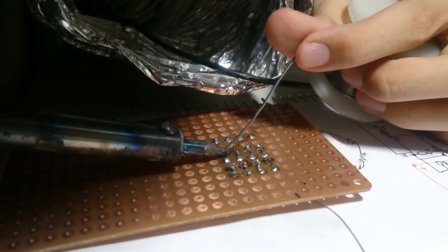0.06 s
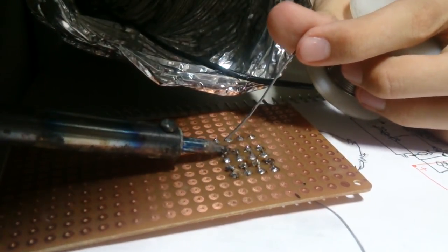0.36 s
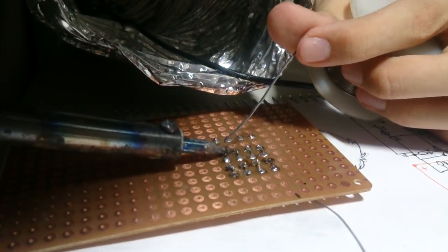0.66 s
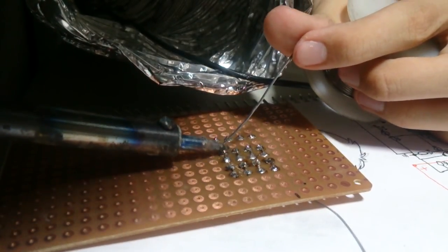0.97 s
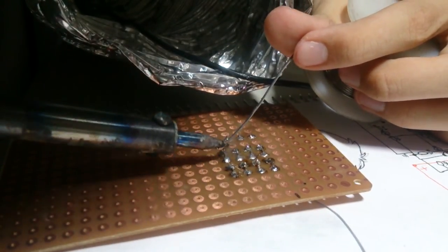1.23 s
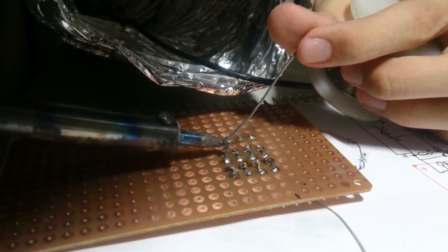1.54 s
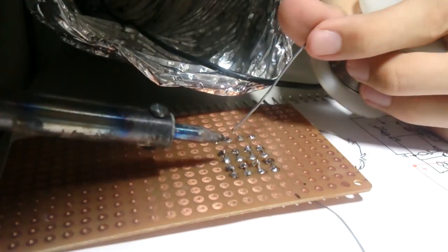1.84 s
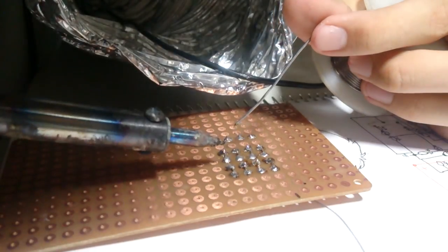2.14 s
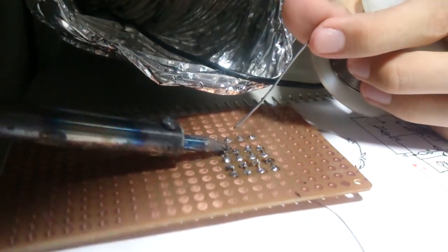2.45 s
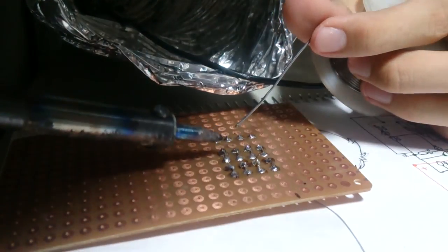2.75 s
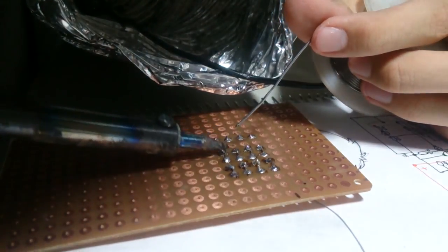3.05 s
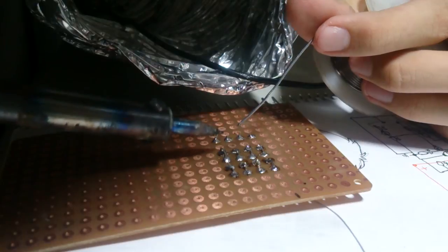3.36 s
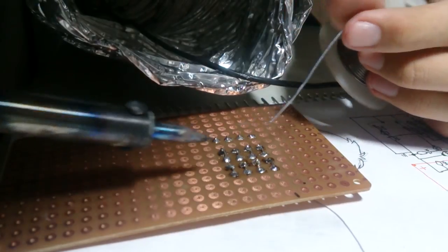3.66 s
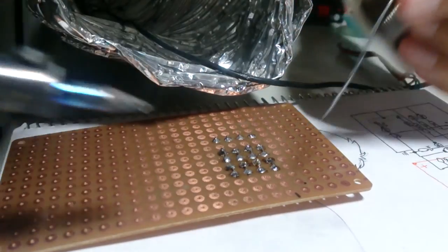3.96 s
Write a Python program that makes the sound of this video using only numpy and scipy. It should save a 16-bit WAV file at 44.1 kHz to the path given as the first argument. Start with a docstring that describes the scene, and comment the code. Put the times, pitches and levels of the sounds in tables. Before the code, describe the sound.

A fan drones throughout, its draught buffeting the close microphone with soft low gusts and thumps on either side, strongest around 0.3, 1.5, 3.2 and 3.8 seconds. On the left, a soldering iron and wire touch a circuit board with tiny bright ticks and scrapes, clearest at 1.1 and 2.6 seconds, fainter near 0.8, 3.5 and 3.8. A faint hiss and thin electrical buzz continue underneath.

```python
"""At a workbench, close to the microphone, someone solders a circuit board.
A fan drones. Its draught buffets the microphone's two openings (ports), each on its own,
in soft low gusts, flutters and thumps. To the left, the iron's tip and the solder wire tick
and scrape briefly on the joints, making the board ring.
A thin mains buzz and a faint hiss run throughout."""
import sys
import numpy as np
from scipy import signal
from scipy.fft import rfft, irfft
from scipy.io import wavfile
from scipy.ndimage import uniform_filter1d

SR = 44100
rng = np.random.default_rng(int(sys.argv[2]) if len(sys.argv) > 2 else 0)


def output_pcm(signal):
    """Save a mono or channel-first signal as 16-bit PCM at the path in sys.argv[1].

    Samples are clipped to [-1, 1] before scaling.
    """
    pcm = np.clip(np.atleast_2d(signal).T, -1, 1) * 32767
    wavfile.write(sys.argv[1], SR, np.round(pcm).astype(np.int16))


N = 176400   # 4 seconds
TIME = np.arange(N) / SR
HZ = np.maximum(np.arange(N // 2 + 1) * SR / N, 1)


def from_db(db):
    """Turn decibels into a number to multiply by."""
    return 10 ** (np.asarray(db) / 20)


def unit_level(x):
    """Scale a signal so that its average level (rms) is 1."""
    return x / np.sqrt(np.mean(x ** 2) + 1e-20)


def curve(rows, column=1):
    """Join a table's points into one value for every frequency."""
    rows = np.array(rows)
    return np.interp(np.log(HZ), np.log(rows[:, 0]), rows[:, column])


def white():
    """The spectrum of fresh noise, equally strong at all frequencies."""
    return rfft(rng.standard_normal(N))


def noise(colour):
    """Noise at level 1; colour says how strong each frequency is."""
    return unit_level(irfft(white() * colour, N))


def swell(start, length, rise, fade):
    """A level that rises, holds and dies away; all times are in seconds."""
    rising = np.clip((TIME - start) / rise + .5, 0, 1)
    return rising * np.exp(-np.maximum(TIME - start - length, 0) / fade)


def steadied(x, seconds):
    """Even out the chance swings in a noise's level."""
    return x / np.sqrt(uniform_filter1d(x ** 2, max(int(seconds * SR), 2)) + 0.056)


def causal(gain):
    """A filter with this gain that never sounds before it is struck (minimum phase)."""
    cepstrum = irfft(np.log(gain + 1e-9), N)
    cepstrum[1:N // 2] *= 2
    cepstrum[N // 2 + 1:] = 0
    return np.exp(rfft(cepstrum))


# The fan's rush of air. Each row: frequency in Hz, relative strength in dB.
RUSH_COLOUR = [(20, 1), (40, 4), (70, 2.5), (110, -5), (165, -11), (260, -10.5), (380, -16), (500, -17),
               (630, -15.5), (750, -17.5), (840, -22), (1000, -21.5), (1120, -25), (1500, -29),
               (2000, -27.5)]
# How alike the rush is at the two ports. Each row: frequency in Hz, likeness from 0 to 1.
RUSH_LIKENESS = [(40, 0.38), (130, 0.53), (290, 1), (640, 1), (1050, 0.69), (1600, 0.61)]
# The fan's tones. Each row: pitch in Hz, level in dB, width in Hz.
BLADE_TONES = [(59.2, -38.5, 2), (119.9, -49, 2), (232, -46.5, 14), (424, -58, 10), (566, -57.5, 18),
               (716, -60.5, 14), (744, -62.5, 3), (874, -59, 20), (951, -63.5, 20), (1024, -63, 18),
               (1064, -66, 3), (1185, -65.5, 28), (1276, -70, 5)]
RUSH_DB, RIGHT_DELAY_S, PAN_DB = -34.5, 0.00022, 0.88
WHINE_HZ, WHINE_DB, WHINE_WAVER_HZ = 481.3, -52, 0.9

def fan():
    """Rushing air, wavering blade tones and a motor whine reach the left port first, and louder."""
    colour = from_db(curve(RUSH_COLOUR)) / (1 + (HZ / 1900) ** 10)
    alike = np.clip(curve(RUSH_LIKENESS), 0, 1)
    shared = white() * np.sqrt(alike)
    blades = sum(from_db(db) * steadied(noise(1 / (1 + (2 * (HZ - hz) / width) ** 2)), seconds=0.21)
                 for hz, db, width in BLADE_TONES)
    pitch = WHINE_HZ + WHINE_WAVER_HZ * noise(1 / (1 + (HZ / 10) ** 2))
    whine = from_db(WHINE_DB) * np.sqrt(2) * np.sin(2 * np.pi * np.cumsum(pitch) / SR)
    tones = rfft(blades + whine)
    ports = []
    for seconds in (0, RIGHT_DELAY_S):
        delay = np.exp(-2j * np.pi * HZ * seconds)
        own = white() * np.sqrt(1 - alike)
        rush = unit_level(irfft(colour * (shared * delay + own), N))
        ports.append(from_db(RUSH_DB) * rush + irfft(tones * delay, N))
    return np.array(ports) * from_db([[PAN_DB], [-PAN_DB]])


# The ports' hiss. Each row: frequency in Hz, left level and right level in dB per Hz.
PORT_HISS = [(1330, -106.5, -99), (1980, -87, -92), (2620, -90.5, -90.5), (3450, -92.5, -95.5),
             (4500, -96, -98), (6440, -98, -101), (8400, -99, -102), (9950, -95, -102),
             (10700, -93.5, -102), (11350, -97.5, -97.5), (12400, -100, -98), (13400, -103, -97),
             (14800, -107, -103), (15700, -114, -108), (16000, -140, -140)]

def hiss():
    """A faint hiss, coloured by each port's own resonance."""
    ports = [irfft(white() * from_db(curve(PORT_HISS, column)), N) for column in (1, 2)]
    return np.array(ports) * np.sqrt(SR / 2)


# Gusts on each port. Each row: start in seconds, length in seconds, level in dB.
GUSTS_ON_LEFT = [(.212, 0.11, -21), (.315, 0.066, -23), (.41, 0.12, -30), (.73, 0.087, -23.5),
                 (1.15, 0.016, -29), (1.435, 0.18, -26.5), (2.085, 0.204, -29.5), (2.88, .16, -28),
                 (3.745, 0.04, -25), (3.97, .036, -28.5)]
GUSTS_ON_RIGHT = [(.08, 0.013, -26), (.22, 0.048, -23), (.77, 0.13, -29.5), (1.325, 0.14, -30.5),
                  (1.5, .083, -21), (1.67, .22, -26), (2.27, 0.12, -25.5), (2.71, 0.021, -23),
                  (2.97, 0.09, -23.5), (3.175, 0.036, -21), (3.77, 0.068, -25.5)]
# The rumble of swirling air. Each row: frequency in Hz, relative strength in dB.
RUMBLE_COLOUR = [(12, 2), (30, 3), (55, 1), (110, -1), (180, -6.5), (270, -16), (400, -22.5), (700, -51),
                 (1500, -75)]
DRAUGHT_DB, LUMP_RATE_HZ, LUMP_DB = -42, 80, 2

def buffeting(gusts):
    """The draught swirls over one port in a lumpy rumble that swells with each gust."""
    gust_power = sum((from_db(db) * swell(start, length, rise=0.0082, fade=0.017)) ** 2
                     for start, length, db in gusts)
    level = np.sqrt(from_db(DRAUGHT_DB) ** 2 + gust_power)
    lumps = from_db(LUMP_DB * noise(1 / (1 + (HZ / LUMP_RATE_HZ) ** 2)))
    rumble = steadied(noise(from_db(curve(RUMBLE_COLOUR))), seconds=0.0316)
    return level * unit_level(rumble * lumps)


BUZZ_HZ, BUZZ_START_S, BUZZ_JITTER_S, BUZZ_SCATTER_DB = 119.93, .0042, .00001, 2.5
BUZZ_RING_HZ, BUZZ_WIDTH_HZ, BUZZ_LEFT_DB, BUZZ_RIGHT_DB = 10930, 450, -67, -82

def mains_buzz():
    """Something on mains power clicks twice a cycle and rings high up, mostly on the left."""
    times = np.arange(BUZZ_START_S, TIME[-1], 1 / BUZZ_HZ)
    late, size = rng.standard_normal((len(times), 2)).T
    at = np.clip((times + BUZZ_JITTER_S * late) * SR, 0, N - 2)
    strength = from_db(BUZZ_SCATTER_DB * size)
    clicks = np.zeros(N)
    clicks[at.astype(int)] = strength * (1 - at % 1)   # each click is split between two samples
    clicks[at.astype(int) + 1] = strength * (at % 1)
    resonance = 1 / (1 + 1j * (HZ - BUZZ_RING_HZ) / BUZZ_WIDTH_HZ) ** 2
    ring = unit_level(irfft(rfft(clicks) * resonance, N))
    return ring * from_db([[BUZZ_LEFT_DB], [BUZZ_RIGHT_DB]])


# Flutters in the hardest gusts.
# Each row: start in seconds, length in seconds, level in dB, pitch in Hz, port (0 left, 1 right).
EDDY_RUNS = [(0.239, 0.042, -27.5, 180, 0), (0.324, 0.021, -27.5, 296, 0), (1.514, 0.016, -20, 162, 1),
             (3.188, 0.0285, -24.5, 145, 1), (3.783, 0.026, -26, 198, 1)]
FLUTTER_OCTAVES, FLUTTER_EDGE_S = 0.55, 0.0051

def flutters():
    """A quick run of eddies (small whirls of air) rubs over one port, unevenly but without gaps."""
    out = np.zeros((2, N))
    for start, length, db, hz, port in EDDY_RUNS:
        band = np.exp(-(np.log2(HZ / hz) / FLUTTER_OCTAVES) ** 2 / 2)
        eddies = steadied(noise(band), seconds=2 / hz)
        out[int(port)] += from_db(db) * swell(start, length, FLUTTER_EDGE_S, FLUTTER_EDGE_S) * eddies
    return out


# Single eddies that hit a port.
# Each row: middle in seconds, peak in dB, half-width in seconds, port (0 left, 1 right).
SINGLE_EDDIES = [(.25, -19, .0014, 0), (.3257, -9, .001, 0), (.666, -12.5, 0.0017, 1),
                 (0.828, -12.5, 0.0015, 1), (.962, -14.5, .0012, 0), (1.4544, -14, .001, 0),
                 (1.565, -18, 0.00104, 1), (1.717, -14, 0.0043, 1), (1.832, -14.5, .0022, 1),
                 (3.182, -15, 0.0021, 1), (3.335, -18.5, 0.00097, 1), (3.76, -12, .0035, 0)]

def thumps():
    """An eddy crossing a port sucks, then pushes, making one soft thump."""
    out = np.zeros((2, N))
    for middle, db, half_width, port in SINGLE_EDDIES:
        position = (TIME - middle) / half_width
        out[int(port)] += from_db(db) * position * np.exp((1 - position ** 2) / 2)
    return out


# The pitches at which the board and wire ring. Each row: pitch in Hz, relative strength in dB.
BOARD_RINGS = [(4150, -9), (5050, -6), (7400, -5.5), (8400, -6), (9550, -5), (10600, -4.5), (11950, -4),
               (13300, -9), (14300, -14), (15500, -18)]
RING_WIDTH_HZ, BRIGHT_DB, BRIGHT_OCTAVES = 520, 11, 0.37

def ring_board(force, bright_hz):
    """A touch rings the board, boosted near bright_hz and dulled from about an octave above it."""
    rings = sum((-1) ** k * from_db(db) / (1 + 2j * (HZ - hz) / RING_WIDTH_HZ)
                for k, (hz, db) in enumerate(BOARD_RINGS))
    boost = from_db(BRIGHT_DB * np.exp(-(np.log2(HZ / bright_hz) / BRIGHT_OCTAVES) ** 2))
    treble_cut = 1 / (1 + (HZ / (1.95 * bright_hz)) ** 10)
    colour = unit_level(np.abs(rings) * boost * treble_cut)
    return irfft(rfft(force) * causal(colour), N)


# The iron's tip and the wire touching the joints.
# Each row: start in seconds, level in dB, fade time of the grinding in seconds, brightest pitch in Hz.
TOUCHES = [(0.826, -46.5, .005, 9000), (0.841, -44, .002, 4500), (.842, -44.5, .004, 8900),
           (1.096, -39, .002, 11800), (1.108, -19.5, 0.00064, 11700), (1.1216, -38, .0015, 10600),
           (1.121, -41, .0018, 3940), (2.5594, -30, .0008, 11000), (2.561, -43, 0.007, 5700),
           (2.617, -39, .0007, 12500), (2.64, -47, 0.0033, 3880), (2.6422, -29.5, 0.003, 9600),
           (3.481, -38, .0012, 10100), (3.792, -41, .0015, 10700)]
GRIND_DB = 3.5   # compared with the snap

def ticks():
    """Each touch is a tiny snap and a moment of grinding; its level and fade time set its energy."""
    out = np.zeros(N)
    for start, db, fade, bright_hz in TOUCHES:
        force = from_db(GRIND_DB) * swell(start, 0, 1 / SR, fade) * rng.standard_normal(N)
        force[int(start * SR)] += np.sqrt(fade * SR / 2)   # the snap
        level = from_db(db) * np.sqrt(fade * SR / (2 * N))
        out += level * unit_level(ring_board(force, bright_hz))
    return out


# How the soldering changes on its way to the right port. Each row: frequency in Hz, change in dB.
RIGHT_SHADOW = [(4000, 1), (9500, -34), (13500, -6)]

def from_the_left(sound):
    """The left port hears the sound as it is; the shaded right port gets less treble."""
    shadow = causal(from_db(curve(RIGHT_SHADOW)))
    return np.array([sound, irfft(rfft(sound) * shadow, N)])


BENCH_DB, BENCH_FADE_S = -13, 0.0076

def bench_echoes(sound):
    """Sound bounces off the bench in a short scatter of echoes, different at each port."""
    tails = rng.standard_normal((2, SR // 8)) * np.exp(-TIME[:SR // 8] / BENCH_FADE_S)
    echoes = [signal.fftconvolve(sound, tail / np.linalg.norm(tail))[:N] for tail in tails]
    return from_db(BENCH_DB) * np.array(echoes)


# Scrapes of the iron's tip or the wire. Each row: start in seconds, length in seconds, level in dB.
TIP_SCRAPES = [(1.084, 0.008, -50), (2.561, 0.004, -33), (2.567, 0.0043, -35), (2.574, 0.0068, -43),
               (3.947, 0.1, -54)]
CRACKLES_PER_S = 4200

def scrapes():
    """Short, bright, crackly scrapes of the iron's tip or the wire ring the board."""
    crackle = unit_level((rng.random(N) < CRACKLES_PER_S / SR) * rng.standard_normal(N))
    level = sum(from_db(db) * swell(start, length, rise=.0004, fade=0.0014)
                for start, length, db in TIP_SCRAPES)
    return ring_board(crackle * level, bright_hz=12050)


def scene():
    """The soldering and its echoes, over the draught, fan, buzz and hiss."""
    soldering = ticks() + scrapes()
    draught = np.array([buffeting(GUSTS_ON_LEFT), buffeting(GUSTS_ON_RIGHT)]) + flutters() + thumps()
    return from_the_left(soldering) + bench_echoes(soldering) + draught + fan() + mains_buzz() + hiss()


LOW_CUT_HZ, HIGH_CUT_HZ = 10, 16600

def record(dry):
    """Thin the deepest rumble and cut off the highest treble steeply."""
    thinned = signal.sosfilt(signal.butter(1, LOW_CUT_HZ, "high", fs=SR, output="sos"), dry)
    return signal.sosfilt(signal.ellip(10, .2, 80, HIGH_CUT_HZ, fs=SR, output="sos"), thinned)


dry = scene()
out = record(dry)
output_pcm(out)
```